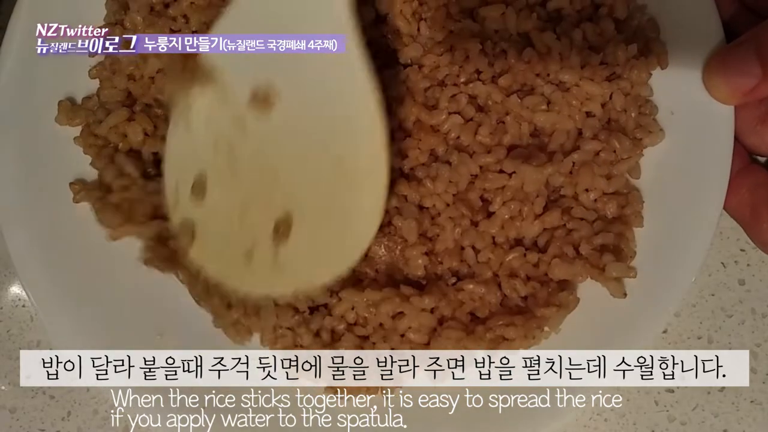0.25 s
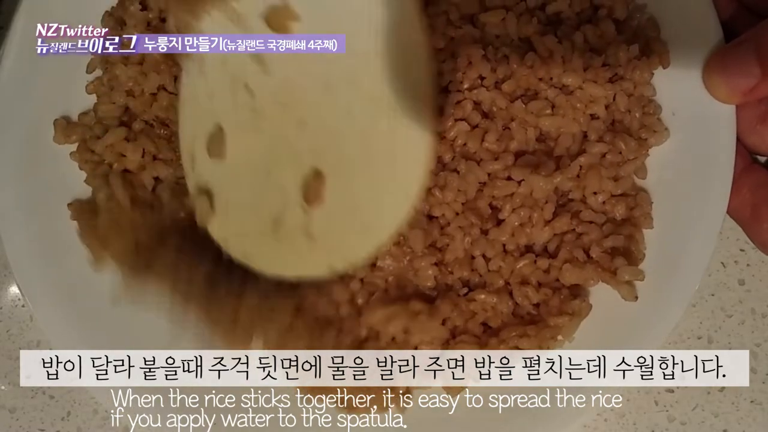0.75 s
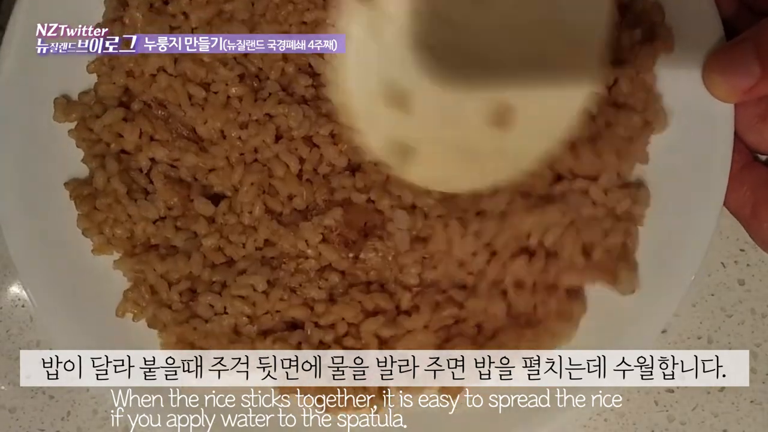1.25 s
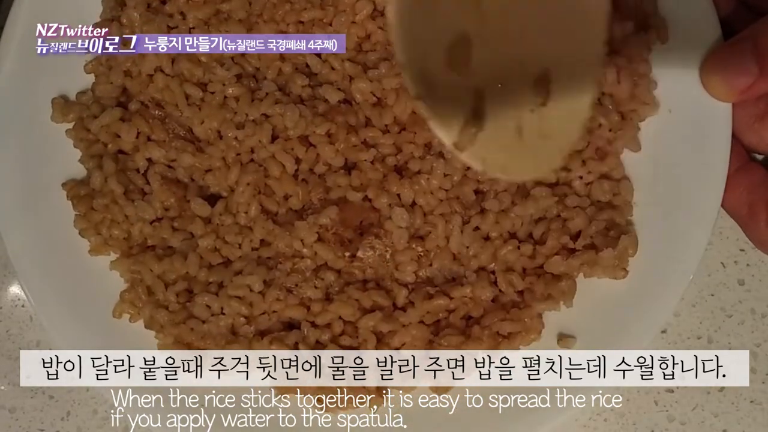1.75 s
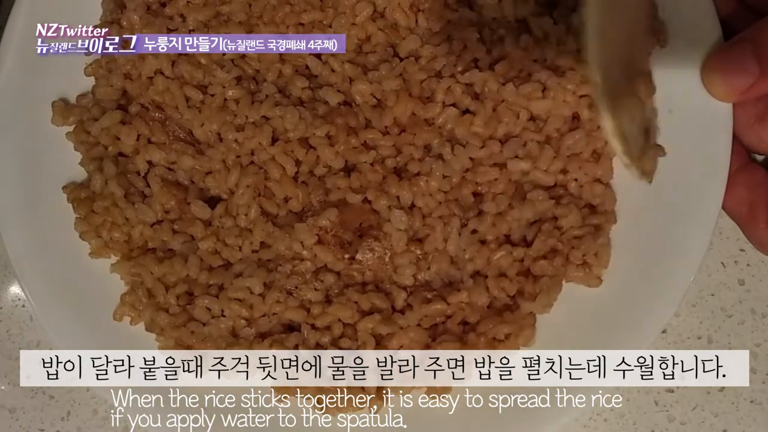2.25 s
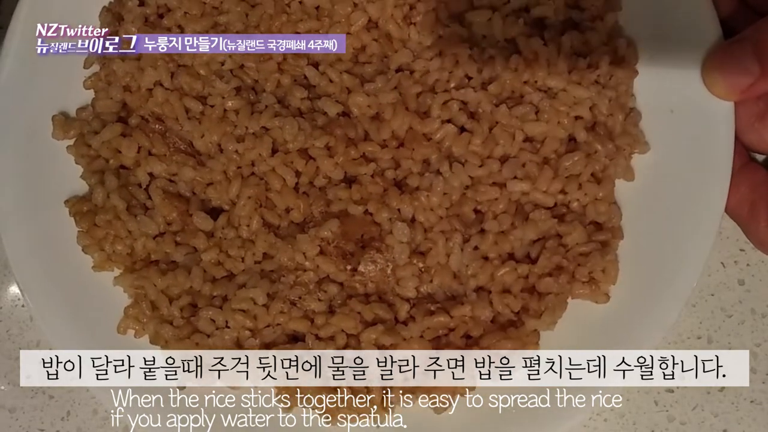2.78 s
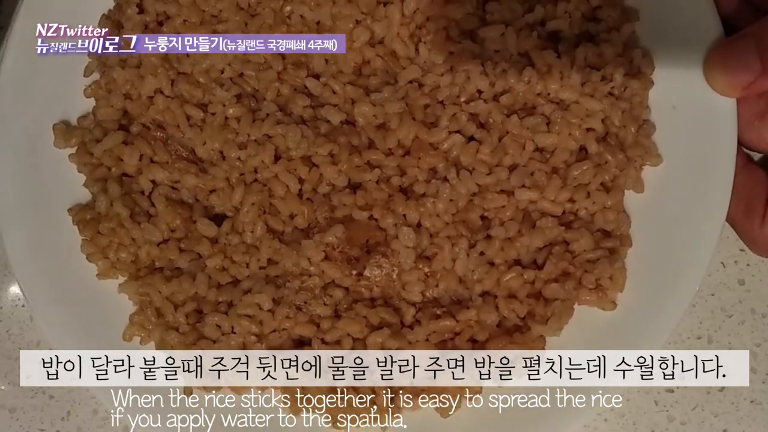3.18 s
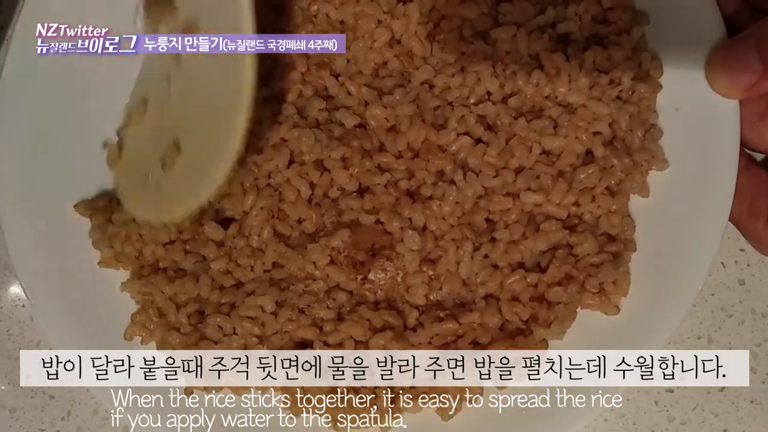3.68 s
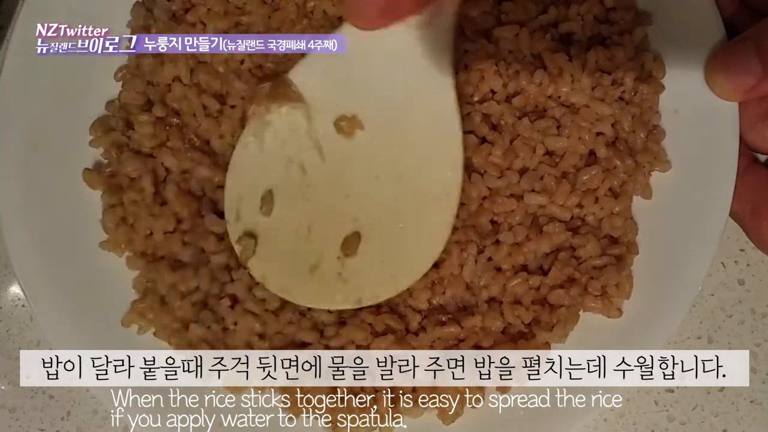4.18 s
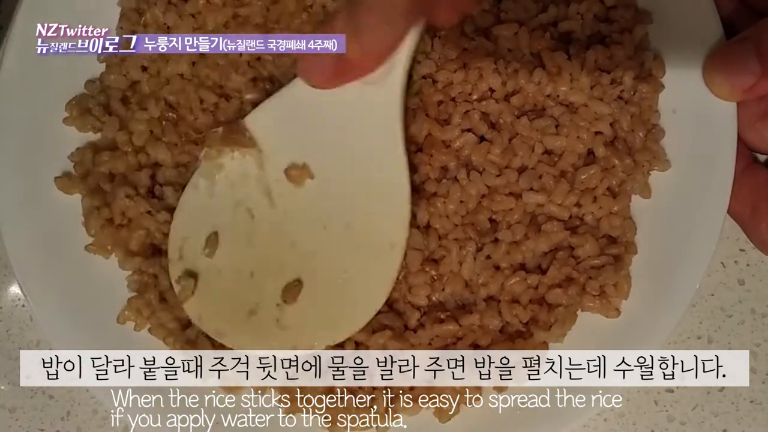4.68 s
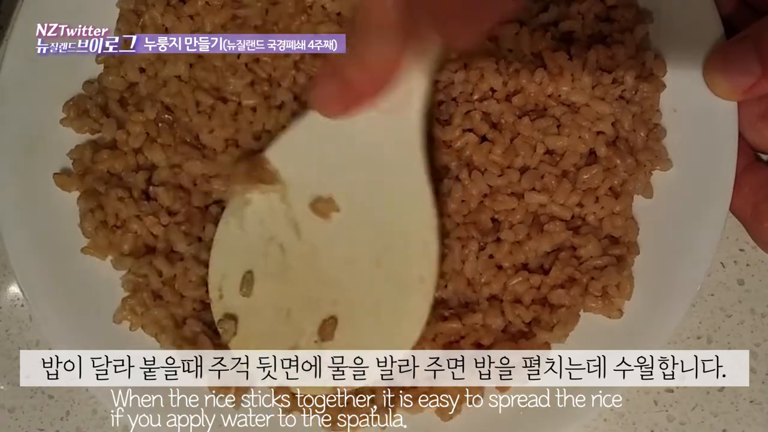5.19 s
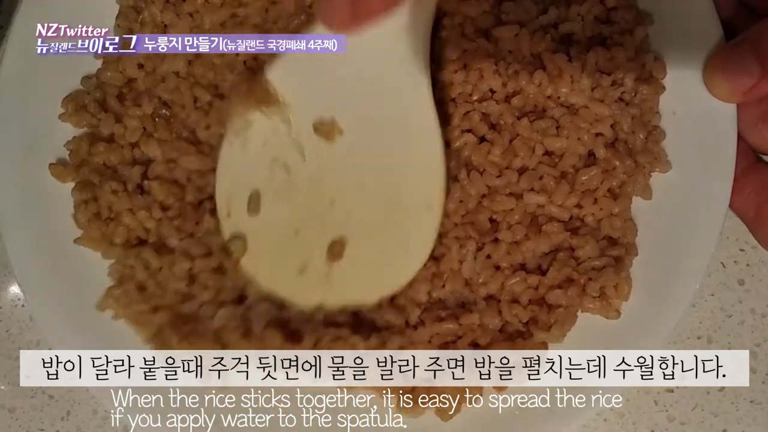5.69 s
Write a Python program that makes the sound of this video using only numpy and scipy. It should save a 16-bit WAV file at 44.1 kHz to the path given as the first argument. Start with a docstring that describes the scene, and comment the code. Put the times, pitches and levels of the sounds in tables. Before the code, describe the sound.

A plastic paddle presses sticky rice on a plate with soft wet clicks and thuds, interrupted by two quick runs of loud, hard knocks.

```python
"""Two quick runs of hard knocks excite the damped modes of a dish, ring in a small kitchen and drive a
fast limiter. Before and after them a plastic paddle presses and spreads sticky cooked rice on a plate:
its edge ticks, the cushioned load thuds, and starchy threads and wet pockets burst as it lands and peels.
Underneath, an appliance hums in the room's hiss, with a faint low burble."""
import sys
import numpy as np
from scipy import signal
from scipy.fft import rfft, irfft, next_fast_len
from scipy.io import wavfile
from scipy.ndimage import map_coordinates

SR = 44100
rng = np.random.default_rng(int(sys.argv[2]) if len(sys.argv) > 2 else 0)


def waveform_to_disk(signal):
    """Save audio, clipped to [-1, 1], as 16-bit WAV at the path in sys.argv[1]."""
    frames = np.transpose(np.atleast_2d(signal))
    scaled = np.clip(frames, -1, 1) * 32767
    samples = np.round(scaled).astype(np.int16)
    wavfile.write(sys.argv[1], SR, samples)


N = 261954
TIME = np.arange(N) / SR
AGE = np.arange(SR // 3) / SR  # time since a blow [s]


def amp(db):
    """Amplitude ratio of a level in decibels."""
    return 10 ** (np.asarray(db) / 20)

def unit(x):
    """Normalisation to rms 1."""
    return x / np.sqrt(np.mean(x ** 2) + 1e-20)

def along(points, hz):
    """Interpolation of (frequency, value) points on a logarithmic frequency axis."""
    freqs, values = np.transpose(points)
    return np.interp(np.log(hz + 1), np.log(freqs), values)

def fade(t60):
    """Exponential decay by 60 dB in t60 seconds."""
    return amp(-60 * AGE / t60)

def wobble(rate):
    """Smooth random modulation: a spline through `rate` knots a second."""
    return map_coordinates(rng.standard_normal(int(N * rate / SR) + 4), [TIME * rate])

def filtered(x, response):
    """Linear filtering: the spectrum is multiplied by a frequency response."""
    n = x.shape[-1]
    padded = next_fast_len(n + 8192)
    return irfft(rfft(x, padded) * response(np.fft.rfftfreq(padded, 1 / SR)), padded)[..., :n]

def direct(x):
    """Path difference: direct sound reaches the left microphone three samples late."""
    return np.array([np.pad(x, (3, 0))[:len(x)], x])

def add(track, start, x):
    """Superposition of x on the track from `start` seconds."""
    i = max(round(start * SR), 0)
    track[:, i:i + x.shape[1]] += x[:, :max(N - i, 0)]

# Left-right coherence of the diffuse field: (frequency [Hz], coherence [0-1])
COHERENCE = [(100, .93), (300, 0.62), (550, 1), (1200, 0.53), (2500, 0.11), (10000, .05)]
def stereo_angle(hz):
    """Half the phase difference whose cosine equals the coherence."""
    return np.arccos(np.clip(along(COHERENCE, hz), -1, 1)) / 2

def noise(colour, size=len(AGE)):
    """Partly coherent stereo noise of rms 1; colour maps Hz to dB."""
    response = lambda hz: amp(colour(hz)) * [np.cos(stereo_angle(hz)), np.sin(stereo_angle(hz))]
    mid, side = filtered(rng.standard_normal((2, size)), response)
    return unit(np.array([mid + side, mid - side]))

def grains(rate, hz, spread, cycles, spiky_db, size):
    """Shot noise of rms 1: `rate` damped tones a second, each lasting a few cycles."""
    count = round(rate * N / SR)
    onsets = rng.uniform(0, N, count).astype(int)
    pitch = hz * np.exp(spread * rng.standard_normal((count, 1)))
    turns = pitch * np.arange(size) / SR
    waves = np.sin(2 * np.pi * turns) * turns / cycles * np.exp(-turns / cycles)
    waves *= amp(spiky_db * np.minimum(rng.exponential(size=pitch.shape), 4))
    samples = onsets[:, None] + np.arange(size)
    return unit(np.bincount(samples.ravel(), waves.ravel(), N)[:N])

def ring(modes, colour=np.zeros_like, scatter_db=3):
    """Free vibration: a sum of damped modes, which each blow excites a little differently."""
    hz, db, t60 = np.transpose(modes)
    gain = amp(db + colour(hz) + scatter_db * rng.standard_normal(len(hz)))
    apart = stereo_angle(hz) * rng.choice([-1, 1], len(hz))
    phase = rng.uniform(0, 2 * np.pi, len(hz)) + np.array([apart, -apart])
    waves = np.sin(2 * np.pi * hz[:, None] * AGE + phase[..., None]) * fade(t60[:, None])
    return gain @ waves / np.linalg.norm(amp(db)) * (1 - np.exp(-AGE / 0.00038))

def contact_peaks(depth_db):
    """Each point of contact has its own random peaks and dips: (frequency [Hz], level [dB])."""
    hz = np.geomspace(400, 16000, 90)
    return np.column_stack([hz, depth_db * rng.standard_normal(len(hz)) * (hz > 500)])

def impact(colour, t60, grit, size=4096):
    """Minimum-phase response to an impulse and a gritty burst, with the energy of 1 ms at rms 1."""
    cepstrum = irfft(np.log(amp(colour(np.fft.rfftfreq(size, 1 / SR))) + 1e-6))
    cepstrum[1:size // 2] *= 2  # folding the cepstrum makes the response causal
    cepstrum[size // 2 + 1:] = 0
    force = rng.standard_normal(len(AGE)) * fade(t60)
    force *= grit / np.linalg.norm(force)
    force[0] += 1
    response = signal.fftconvolve(force, irfft(np.exp(rfft(cepstrum))))[:len(AGE)]
    return direct(response / np.linalg.norm(response) * np.sqrt(SR / 1000))

# Reverberation time of the kitchen: (frequency [Hz], t60 [s])
KITCHEN_DECAY = [(200, 0.41), (600, 0.19), (1500, 0.23), (4000, 0.19), (9000, .22), (15000, 0.15)]
def in_room(x, wet_db):
    """Reverberation: convolution adds a diffuse tail in which each band decays at its own rate."""
    hz, t, spectrum = signal.stft(noise(np.zeros_like), SR, nperseg=256)
    decay = amp(-60 * t / along(KITCHEN_DECAY, hz)[:, None])
    tail = signal.istft(spectrum * decay, SR, nperseg=256)[1][:, :len(AGE)]
    tail *= 1 - np.exp(-AGE / 0.0046)
    tail /= np.linalg.norm(tail[0])
    return x + amp(wet_db) * signal.fftconvolve(x, tail, axes=1)[:, :len(AGE)]

# Spectrum of the room's hiss: (frequency [Hz], relative density [dB])
HISS_SPECTRUM = [(470, -28), (800, -6.5), (918, -10), (990, 2.5), (1040, -8.5), (1190, -6.5), (2660, -16.5),
                 (3980, -18), (6090, -21), (9100, -20), (10600, -26), (16000, -13.5)]
def room_hiss():
    """Stationary broadband noise in a diffuse field."""
    return amp(-66) * noise(lambda hz: along(HISS_SPECTRUM, hz), N)

def burble():
    """Low shot noise comes and goes under random amplitude modulation."""
    upper = grains(rate=110, hz=600, spread=.17, cycles=3, spiky_db=2, size=2048)
    lower = grains(rate=60, hz=220, spread=.15, cycles=2, spiky_db=2, size=3072)
    return amp(-75.5) * unit((upper + .7 * lower) * amp(-20 * wobble(14) ** 2))

# Envelope of the hum: (time [s], relative level [dB])
HUM_ENVELOPE = [(0.0, -69.5), (0.28, -71.5), (0.45, -64.5), (0.74, -68), (1.0, -94), (1.38, -70),
                (1.75, -96.5), (2.3, -62), (2.7, -74), (3.0, -70), (3.52, -92), (3.73, -66), (4.08, -91),
                (4.6, -76), (4.95, -93), (5.58, -95), (5.83, -68.5)]
# Partials of the hum: (frequency [Hz], relative level [dB])
HUM_PARTIALS = [(98, -3), (197, -5.5), (295, -18)]
def appliance_hum():
    """Near-harmonic partials waver in amplitude and phase over a low band of noise."""
    partials = sum(amp(db + 1.5 * wobble(14)) * np.sin(2 * np.pi * hz * TIME + .35 * wobble(14))
                   for hz, db in HUM_PARTIALS)
    band = [(60, -33.5), (120, -1), (200, 6.5), (290, -13.5), (450, -22), (1500, -62.5)]
    drone = amp(-10.5) * noise(lambda hz: along(band, hz), N)
    level_db = np.interp(TIME, *np.transpose(HUM_ENVELOPE))
    return amp(level_db + 4.5) * (partials + drone) * amp([[-1.5], [1.5]])

# Spells in which the paddle works the rice: (start [s], end [s])
WORKING_SPELLS = [(0, 1.8), (4.0, 5.1)]
def grain_pops():
    """Adhesion fails grain by grain: sparse damped pulses while the rice is worked."""
    working = sum((TIME >= start) & (TIME < end) for start, end in WORKING_SPELLS)
    pops = grains(rate=8, hz=3200, spread=.25, cycles=1.2, spiky_db=2, size=384)
    return amp(-82) * direct(working * pops)

# Low modes of the loaded plate: (frequency [Hz], relative level [dB], t60 [s])
PLATE_MODES = [(391, -15, 0.067), (481, -7, .1), (620.6, -2, 0.074), (717, -12, .06)]
# How freely the plate rings under the paddle: (time [s], relative level [dB])
PLATE_FREEDOM = [(0, -4), (1.5, -23.5), (4.3, -18), (4.6, -10), (5.65, -6.5)]
def plate_ring(start):
    """Modal response of the loaded plate to a press at `start` seconds."""
    return amp(np.interp(start, *np.transpose(PLATE_FREEDOM))) * ring(PLATE_MODES)

# Paddle presses, in relative levels: (time [s], tick [dB], thud [dB], squelch [dB])
PADDLE_PRESSES = [(0.0708, -42, -62, -80), (0.3549, -40.5, -50.5, -52), (0.501, -47, -42, -68),
                  (0.584, -71, -49.5, -68), (0.669, -41.5, -64, -58.5), (0.7928, -36.5, -46.5, -68),
                  (0.843, -54, -52, -76), (1.312, -44.5, -48.5, -73), (1.6265, -47, -71, -93),
                  (1.715, -55.5, -41.5, -90.5), (4.129, -51, -43, -60.5), (4.291, -58, -35.5, -72.5),
                  (4.362, -64, -52, -67), (4.4644, -29.5, -54, -48), (4.5541, -39, -44, -58.5),
                  (4.639, -69, -53, -78), (4.744, -25, -74, -44.5), (5.132, -61, -47, -68),
                  (5.208, -36, -72, -65.5), (5.588, -35, -56, -53.5), (5.6525, -45.5, -36.5, -54),
                  (5.6897, -31.5, -72, -55), (5.748, -45, -33.5, -54.5), (5.8522, -37.5, -35.5, -54)]
# Short low rumble trailing each thud: (frequency [Hz], relative density [dB])
RUMBLE_SPECTRUM = [(50, -32), (80, -16), (110, 0), (200, -1.5), (300, -8), (500, -35), (1500, -97)]
def thuds(hz=206.3, lead_s=0.0006):
    """Cushioned impact: rice softens the onset of a few low cycles of plate on counter; a rumble trails."""
    out = np.zeros((2, N))
    push = amp(3) * np.sin(2 * np.pi * hz * AGE) * fade(0.042)
    onset = 1 - np.exp(-(AGE / 0.0048) ** 2)
    for start, _, db, _ in PADDLE_PRESSES:
        plate = amp(6.5) * plate_ring(start) * fade(0.1)
        rumble = amp(-10.5) * noise(lambda hz: along(RUMBLE_SPECTRUM, hz)) * fade(0.13)
        add(out, start - lead_s, amp(db) * (push + plate + rumble) * onset)  # rice is met before plate
    return out

# The paddle slides and peels off the rice: (centre time [s], relative level [dB])
PADDLE_PEELS = [(0.446, -56.5), (0.7, -63.5), (0.864, -58), (0.968, -59), (1.255, -57), (4.155, -67.5),
                (4.239, -57.5), (4.385, -71.5), (4.995, -56), (5.235, -66), (5.811, -58), (5.916, -58.5)]
# Fizz of wet rice: (frequency [Hz], relative density [dB])
FIZZ_SPECTRUM = [(880, -43), (1500, -18), (2390, -4.5), (3220, -14), (3810, -1.5), (8320, -1.5),
                 (9280, -6.5), (14500, 1), (16000, -10.5)]
def squelches(rise_s=0.0072, fall_s=0.012, peel_half_s=0.027):
    """Rupture noise: starchy threads snap and wet pockets pop in clumps as the paddle lands and lifts."""
    landing = sum(amp(db) * np.exp(-np.maximum((start - TIME) / rise_s, (TIME - start) / fall_s))
                  for start, _, _, db in PADDLE_PRESSES)
    lifting = sum(amp(db) * np.exp(-2 * ((TIME - centre) / peel_half_s) ** 2)
                  for centre, db in PADDLE_PEELS)
    settling = amp(-77.5)
    clumps = amp(2 * wobble(130))
    threads = direct(grains(rate=700, hz=7500, spread=.35, cycles=.6, spiky_db=4.5, size=128))
    pockets = direct(grains(rate=180, hz=3500, spread=.1, cycles=2, spiky_db=3, size=512))
    fizz = noise(lambda hz: along(FIZZ_SPECTRUM, hz), N)
    wet = clumps * (fizz + amp(-5) * threads + amp(-7.5) * pockets)
    return (landing + lifting + settling) * wet * amp([[-2.2], [0.2]])

# Modes of the plastic paddle before extra damping: (frequency [Hz], bandwidth [Hz], relative level [dB])
PADDLE_MODES = [(1630, 70, -10), (2100, 190, 5), (2950, 69, 4.5), (3227, 65, -2), (3340, 86, 8),
                (4000, 90, 3), (6370, 120, 2)]
# Spectrum of the edge's contact: (frequency [Hz], relative density [dB])
TICK_SPECTRUM = [(290, -83.5), (500, -1), (621, -2.5), (1050, -4.5), (3020, 5), (3590, -7), (4030, 4.5),
                 (5090, -14.5), (10100, -13.5), (16000, -19)]
def ticks():
    """Hard contact: the paddle's edge snaps on the plate and sets both in free vibration."""
    out = np.zeros((2, N))
    plastic_modes = [(hz, db, np.log(1000) / np.pi / width) for hz, width, db in PADDLE_MODES]
    for start, db, _, squelch_db in PADDLE_PRESSES:
        wetness_db = min(squelch_db - db + 23.5, 24)
        treble = [(4000, 0), (8000, 0.6 * wetness_db)]  # wetter presses are brighter
        peaks = contact_peaks(depth_db=6)
        colour = lambda hz: along(TICK_SPECTRUM, hz) + along(treble, hz) + along(peaks, hz)
        snap = amp(-7.5) * impact(colour, t60=0.0074, grit=0.35)
        clatter = amp(-6) * noise(colour) * fade(0.04) * (1 - np.exp(-AGE / 0.00011))
        plastic = amp(-7) * ring(plastic_modes) * fade(0.12)
        plate = amp(-8) * plate_ring(start)
        add(out, start + 0.0009, amp(db) * in_room(snap + clatter + plastic + plate, wet_db=-13.5))
    return out * amp([[-2.1], [2.1]])

# Blows on the dish: (time [s], strength [dB], most excited frequency [Hz], body [dB], treble [dB])
DISH_BLOWS = [(1.8692, -10, 4140, 6, -1.5), (1.9986, -7, 3000, 5, -3), (2.1399, -0.9, 3950, 0.5, -3.5),
              (2.2873, -21, 2820, 11, 4), (2.4196, -1.2, 3770, 0.7, -4.5), (2.5757, -4, 3900, 1.6, -1.2),
              (3.0821, -15, 2474, -6, -2.5), (3.2225, 0.5, 4100, 1, 1), (3.3683, -1, 2680, 0.4, 2.1),
              (3.5108, -16.5, 3086, 0.5, -4), (3.643, -10, 3020, 3, -2.8)]
# Modes of the dish: (frequency [Hz], relative level [dB], t60 [s])
DISH_MODES = [(342, -18, .14), (488, -10.5, .11), (590, -15, .06), (690, -10, .07), (850, -10, .08),
              (1074, -11, .1), (1235, -9, .12), (1577, -2.5, .11), (1669, -2, .11), (1734, -2.5, .1),
              (1923, -6, .12), (1994, -2, .13), (2123, -4, .11), (2507, -4, .12), (2940, -2, .08),
              (3095, -2, .1), (3398, -3, .12), (3650, -6, .12), (3910, -3, .1), (4074, -1.5, .1),
              (4213, -4, .11), (4396, -5, .1), (5860, -9, .08), (7610, -7, .07), (9630, -8, .08),
              (11180, -9, .1), (11900, -5, .07), (14200, -6, .06)]
# Spectrum of a hard contact: (frequency [Hz], relative density [dB])
CRACK_SPECTRUM = [(35, -50), (60, -27.5), (202, -12), (346, -22.5), (398, -35), (480, -10.5), (968, -20.5),
                  (1060, -12), (1440, -17), (1580, -4.5), (2350, -8), (4030, -6), (7060, -7), (14900, -8),
                  (16000, -10)]
# Level difference between the microphones: (frequency [Hz], left minus right [dB])
DISH_BALANCE = [(300, -1), (820, 1), (1000, 4.5), (1220, -3.5), (1700, -3.5), (1900, 1.5), (2400, 1),
                (2950, -2), (3600, -1), (15000, -1)]
def knocks():
    """Impulsive excitation: each blow gives a crack, a dense clatter and the ring of the dish's modes."""
    out = np.zeros((2, N))
    swell_rise = np.linspace(0, 1, round(.0065 * SR)) ** 0.64
    bass_cut = [(80, -17.5), (450, -4)]
    crack_shape = [(1100, -3), (2200, -2.5), (4500, 3), (8000, -12)]
    swell_shape = [(1500, -8.5), (7500, 2.5), (10000, 8.5)]
    for start, db, spot_hz, body_db, treble_db in DISH_BLOWS:
        bass_db = body_db - 0.43 * db - 3  # harder blows are shorter, so they carry less bass
        tilt = [(300, bass_db), (900, body_db), (2000, 0.0062), (4500, 0.011), (8000, treble_db)]
        curves = [CRACK_SPECTRUM, tilt, contact_peaks(depth_db=3.5), bass_cut]
        # the struck spot favours one group of resonances
        spot = lambda hz: 2.5 * np.exp(-(np.log(hz / spot_hz) / .14) ** 2)
        colour = lambda hz: spot(hz) + sum(along(curve, hz) for curve in curves)
        crack = amp(1.5) * impact(lambda hz: colour(hz) + along(crack_shape, hz), t60=0.014, grit=0.5)
        clatter = amp(-3) * noise(colour) * fade(0.037) * (1 - np.exp(-AGE / 0.00026))
        dish = amp(-16.5) * ring(DISH_MODES, lambda hz: along(tilt, hz))
        add(out, start, amp(db) * in_room(crack + clatter + dish, wet_db=-14.5))
        # a brief swell of bright hiss just before each crack
        swell = noise(lambda hz: colour(hz) + along(swell_shape, hz), len(swell_rise)) * swell_rise
        add(out, start - len(swell_rise) / SR, amp(db - 19) * swell)
    return filtered(out, lambda hz: amp(along(DISH_BALANCE, hz) * np.array([[.5], [-.5]])))

def scene():
    """Superposition of all sources at the two microphones."""
    background = room_hiss() + burble() + appliance_hum()
    return background + grain_pops() + thuds() + squelches() + ticks() + knocks()

def limited(x, ceiling_db, detector_s, smoothing_s):
    """Limiting: gain lags the rms level, so a crack slips through and the loud ring is held down."""
    def smooth(y, seconds):
        pole = np.exp(-1 / (seconds * SR))
        return signal.lfilter([1 - pole], [1, -pole], y)
    level = np.sqrt(smooth(np.mean(x ** 2, axis=0), detector_s))
    reduction = 1 - (1 + (level / amp(ceiling_db)) ** 4) ** (-1 / 4)
    return x * (1 - smooth(reduction, smoothing_s))

def record(dry, low_hz=75, top_hz=15850):
    """Limiting and soft saturation, then the microphone's bass cut and a steep band limit."""
    x = limited(dry, ceiling_db=-16, detector_s=0.0011, smoothing_s=0.0005)
    x = x / (1 + (x / .47) ** 4) ** (1 / 4)
    x = signal.sosfilt(signal.butter(3, low_hz, "high", fs=SR, output="sos"), x)
    return filtered(x, lambda hz: 1 / np.sqrt(1 + (hz / top_hz) ** 160))


dry = scene()
out = record(dry)
waveform_to_disk(out)
```